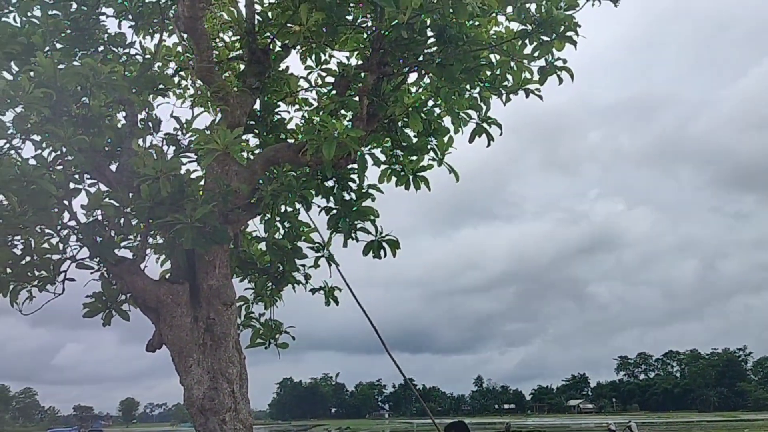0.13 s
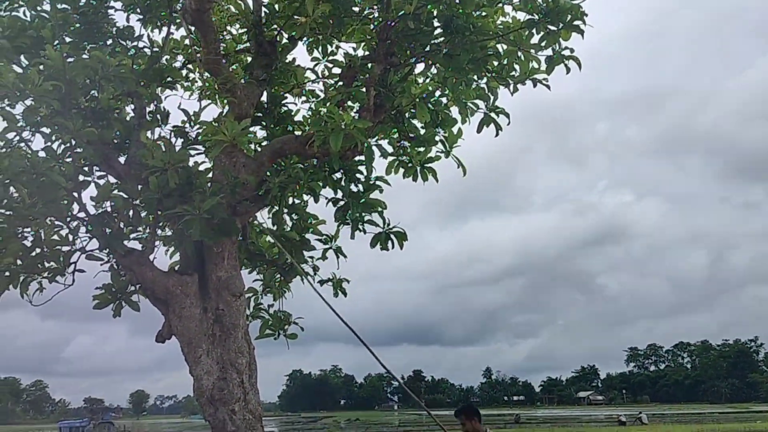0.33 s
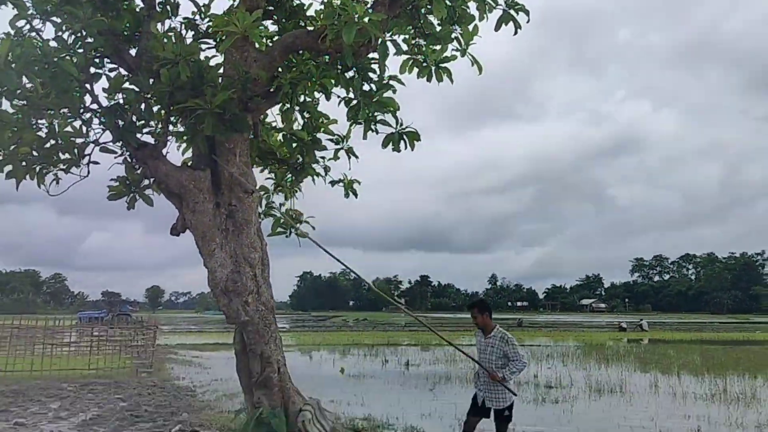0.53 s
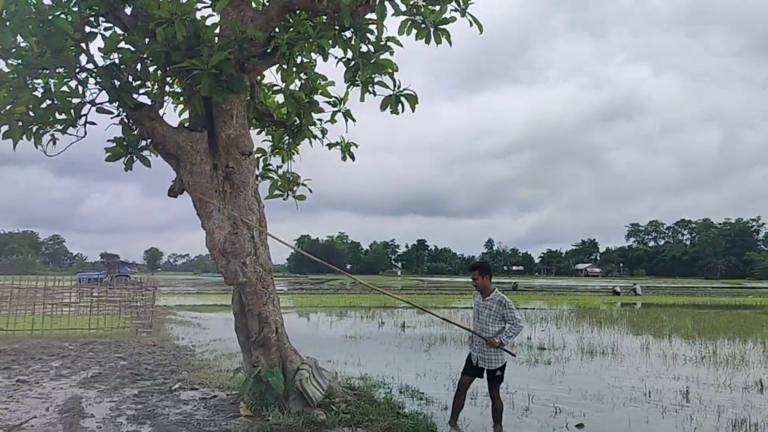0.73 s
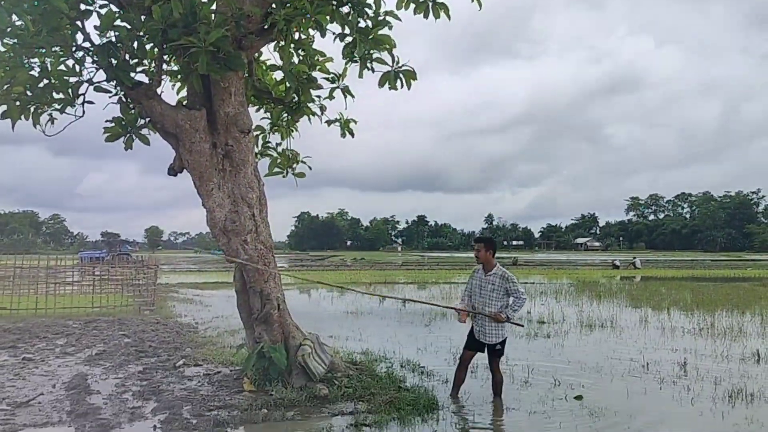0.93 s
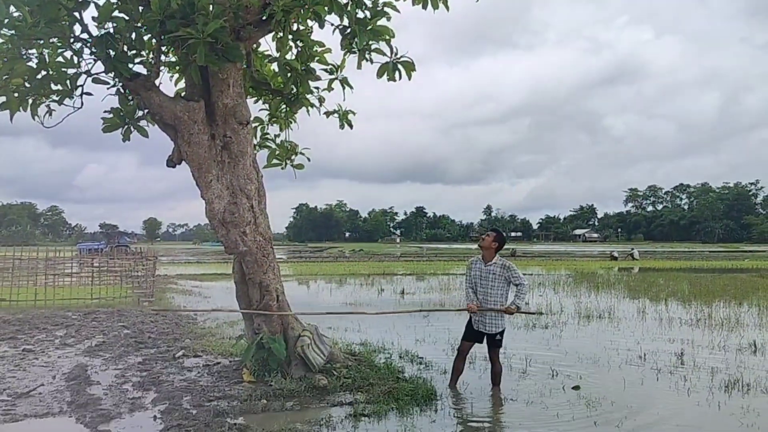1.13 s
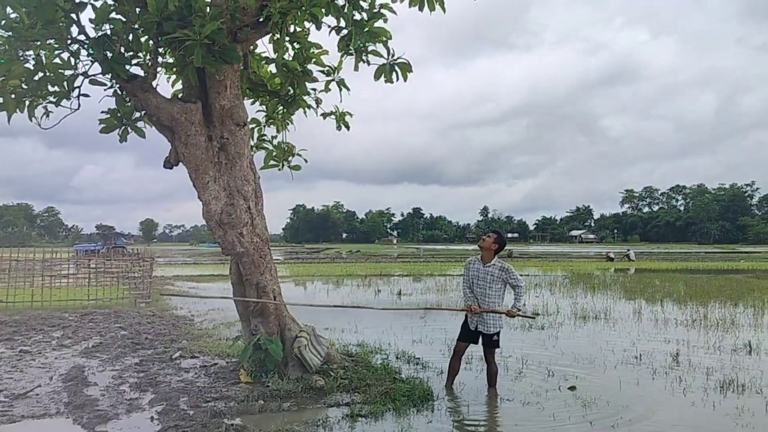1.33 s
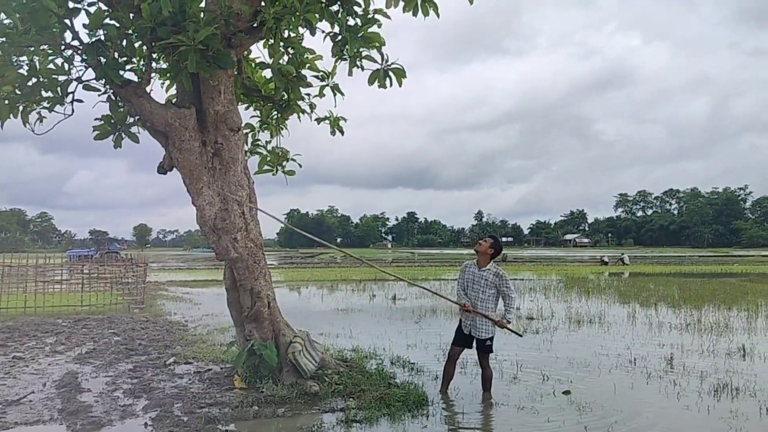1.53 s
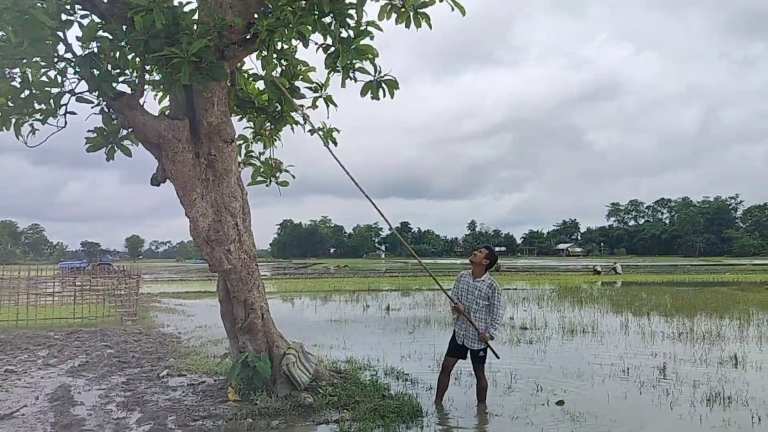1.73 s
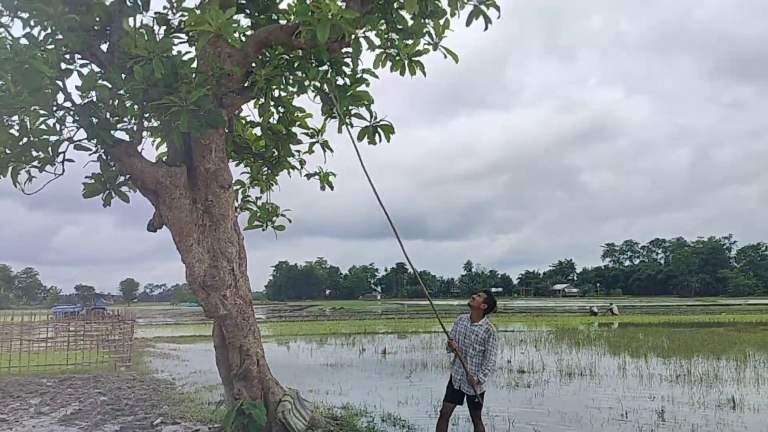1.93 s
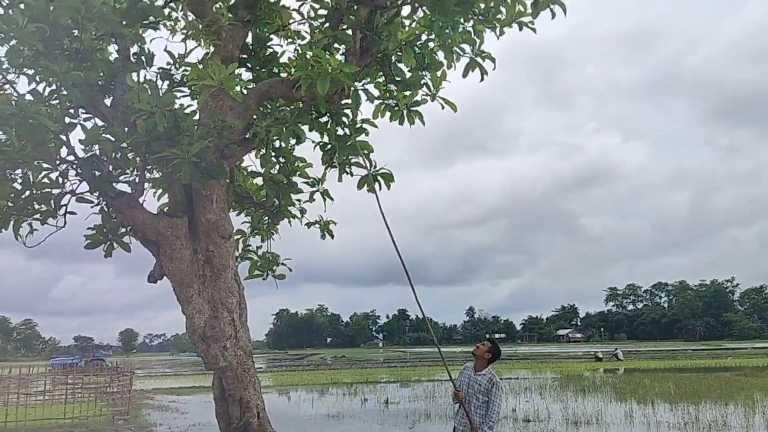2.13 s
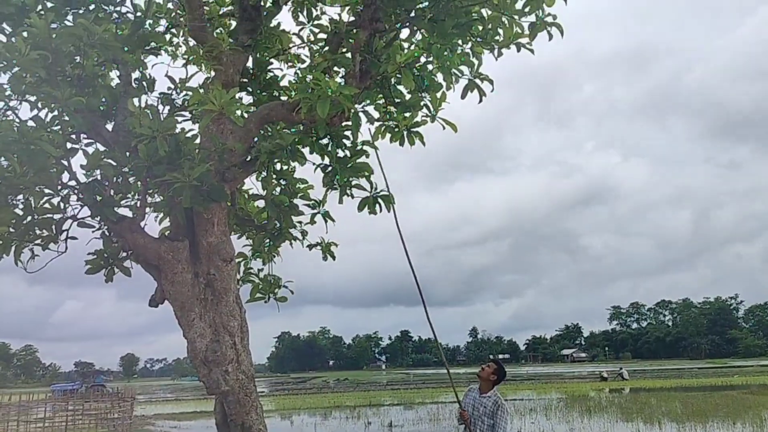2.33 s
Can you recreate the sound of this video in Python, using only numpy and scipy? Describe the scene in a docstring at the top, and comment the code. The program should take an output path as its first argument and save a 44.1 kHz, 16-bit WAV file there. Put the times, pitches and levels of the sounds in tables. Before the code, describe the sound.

A bamboo pole ticks sharply against a leafy branch, then later strikes it in a harder woody clatter with rustling leaves; wind buffets the hand-held microphone while a bird whistles and buzzes in open fields.

```python
"""Beside flooded fields, a bamboo pole knocks and clatters against leafy branches: bursts of contacts ring
wood modes, and showers of tiny snaps make the leaves. To the right a bird buzzes (beating noise bands) and
whistles (gliding near-sines); others call far off. Something small plops into the water (a rising sine).
Wind rumbles and buffets the two ports of a hand-held microphone (noise and slow cycles), insects hiss
high up (narrow noise bands), and a faint noise bed is the open air."""
import sys
import numpy as np
from scipy import signal
from scipy.fft import rfft, irfft
from scipy.io import wavfile
from scipy.ndimage import uniform_filter1d

SR = 44100
rng = np.random.default_rng(int(sys.argv[2]) if len(sys.argv) > 2 else 0)


def digitize_waveform(pressure):
    """Quantize a signal to 16-bit integers and store it at the path in sys.argv[1].

    Rows of a 2-D input are taken as channels; values are limited to [-1, 1].
    """
    field = np.atleast_2d(pressure).T
    bounded = np.clip(field, -1, 1)
    quanta = np.round(bounded * 32767).astype(np.int16)
    wavfile.write(sys.argv[1], SR, quanta)


N = 105310  # length in samples


def gain_of(db):
    """Decibels to amplitude gain."""
    return 10 ** (np.asarray(db) / 20)


def evened(x):
    """Scales to rms 1."""
    return x / np.sqrt(np.mean(x ** 2) + 1e-20)


def read(points, hz):
    """Reads a table of values on a log-frequency axis."""
    f, value = np.transpose(points)
    return np.interp(np.log(hz + 1), np.log(f + 1), value)


def add(mix, s, sound):
    """Mixes a sound in at time s in seconds, cut off at the end of the mix."""
    part = mix[..., max(round(s * SR), 0):][..., :sound.shape[-1]]
    part += sound[..., :part.shape[-1]]


def drift(rate_hz, size):
    """Smooth random wander of rms 1: noise with its fast changes removed."""
    hz = np.fft.rfftfreq(size, 1 / SR)
    return evened(irfft(rfft(rng.standard_normal(size)) * np.exp(-(hz / rate_hz) ** 2), size))


def resonate(x, hz, width):
    """Band of gain 1 around hz (fixed or moving): shift to zero, smooth twice for steep skirts, shift back."""
    turn = np.exp(2j * np.pi * np.cumsum(hz * np.ones(x.shape[-1])) / SR)
    r = np.exp(-np.pi * width / SR)
    smooth = signal.lfilter([(1 - r) ** 2], [1, -2 * r, r * r], x / turn)
    return 2 * (turn * smooth).real


def colour(x, table):
    """Filters each channel by a spectrum in dB."""
    return irfft(rfft(x) * gain_of(read(table, np.fft.rfftfreq(N, 1 / SR))), N)


ECHO_DB, ECHO_T60_S = -2.5, 0.19


def place(x, pan_db, lag_s, t60=ECHO_T60_S):
    """Direct sound reaches the left port lag_s late; trunk, ground and water scatter it differently to each."""
    hz = np.fft.rfftfreq(N, 1 / SR)
    late = irfft(rfft(x) * np.exp(-2j * np.pi * hz * lag_s), N)
    t = np.arange(8000) / SR
    sparse = rng.standard_normal((2, 8000)) * (rng.random((2, 8000)) < .05)
    taps = sparse * gain_of(-60 * t / t60) * (t > .001)
    taps = taps / np.linalg.norm(taps, axis=1, keepdims=True)
    wet = signal.fftconvolve(x[None], taps, axes=1)[:, :N]
    return (np.array([late, x]) + gain_of(ECHO_DB) * wet) * gain_of([[pan_db / 2], [-pan_db / 2]])


def field(table, same, size, patchy_db, lag_s=0):
    """Stereo noise of rms 1 from random short-time spectra with drifting patches."""
    frames, hz = 4 * N // size + 5, np.fft.rfftfreq(size, 1 / SR)
    a, b, c, d, patches = rng.standard_normal((frames, len(hz), 5)).T
    patches = evened(uniform_filter1d(uniform_filter1d(patches, size=8, axis=0), size=8, axis=1))
    same = np.clip(read(same, hz), -1, 1)[:, None]
    left = a + 1j * b
    shared = same * left * np.exp(2j * np.pi * lag_s * hz)[:, None]
    z = np.array([left, shared + np.sqrt(1 - same ** 2) * (c + 1j * d)])
    z *= gain_of(read(table, hz)[:, None] + patchy_db * patches)
    return evened(signal.istft(z, nperseg=size, noverlap=3 * size // 4)[1][:, :N])


# Blows of the pole. Each row: start in seconds, level in dB, clatter length in seconds, best-rung pitch in Hz.
POLE_BLOWS = [(0.2697, -41.5, 0.002, 2930), (0.2729, -40, 0.002, 2360), (0.284, -59, 0.0025, 2520),
              (1.176, -62, 0.003, 1900), (1.2187, -61, 0.0028, 2190), (1.9055, -27, 0.0088, 2160),
              (1.918, -37.5, 0.022, 2720), (1.924, -35, 0.018, 460), (1.949, -39, 0.0073, 1240),
              (1.959, -35, 0.01, 1370), (1.969, -41, 0.025, 1800), (2.094, -47.5, 0.018, 2020),
              (2.12, -53.5, .012, 1360), (2.151, -57, 0.0055, 3560)]
# Ring of pole and branch. Each row: pitch in Hz before detuning, level in dB, t60 in seconds.
WOOD_MODES = [(311, -0.5, 0.16), (392, -2, 0.087), (850, -21.5, 0.032), (933, -0.5, .02),
              (1219, 2.5, 0.031), (1355, 5, 0.036), (1710, -3, 0.044), (1948, 0.5, 0.063), (2190, 9, 0.011),
              (2753, 0, 0.02), (2934, 3, 0.017), (3490, -15.5, .02), (3750, -6.5, 0.031), (4820, -19, 0.03)]
# Struck places, before and after the pole is lowered. Each row: left-right in dB, left lag in seconds.
STRUCK_PLACES = [(0, -.00004), (-4.5, -.00022)]
LOWERED_S, BOUGH_T60_S = 1, 0.085
CONTACTS_PER_S, CRACK_DB = 2500, 1.5
OFF_PITCH_DB_PER_OCTAVE = -14
SPOT_DETUNE = .03  # largest random shift of a mode, as a share of its pitch


def pole():
    """Each blow is a short clatter of contacts that rings the wood, best near the pitch of the struck spot."""
    out, t = np.zeros((2, N)), np.arange(5000) / SR
    for s, db, length, best_hz in POLE_BLOWS:
        chance, size = rng.random(2000), rng.uniform(-0.84, 1, 2000)
        arch = np.sqrt(np.sin(np.pi * np.clip(t[:2000] / length, 0, 1)) + 1e-9)
        contacts = (chance < CONTACTS_PER_S / SR) * size * arch
        contacts[0] = 0.3  # the first touch always sounds
        ring = np.zeros(5000)
        for hz, mode_db, t60 in WOOD_MODES:
            off_pitch_db = OFF_PITCH_DB_PER_OCTAVE * abs(np.log2(hz / best_hz))
            spot_hz = hz * (1 + SPOT_DETUNE * rng.uniform(-1, 1))
            ring += gain_of(mode_db + off_pitch_db - 60 * t / t60) * np.sin(2 * np.pi * spot_hz * t)
        crack = resonate(rng.standard_normal(5000), 4960, 6000)
        # higher-pitched spots crack louder
        ring += gain_of(CRACK_DB - 60 * t / 0.0077) * crack * best_hz / 2000
        blow = np.convolve(contacts, ring) / np.linalg.norm(contacts)
        add(out[int(s > LOWERED_S)], s, gain_of(db) * blow)
    return sum(place(x, *spot, BOUGH_T60_S) for x, spot in zip(out, STRUCK_PLACES))


# Shaken leaves. Each row: start in seconds, level in dB, t60 in seconds.
LEAF_SHAKES = [(.0, -43, 0.15), (0.163, -55, 0.045), (0.274, -37, 0.081), (0.286, -50, 0.25),
               (0.38, -61.5, 0.26), (0.946, -68.5, 0.19), (1.61, -56.5, 0.21), (1.908, -51.5, 0.48),
               (1.962, -51.5, 0.46), (2.021, -51, 0.037), (2.098, -58, 0.14), (2.238, -63, 0.58)]
# Leaf spectrum. Each row: frequency in Hz, relative level in dB per Hz.
LEAF_COLOUR = [(350, -95), (957, -26), (1180, -17.5), (2400, -13), (2950, -10), (5260, -30), (8200, -16.5),
               (11700, -18.5), (16000, -45)]
SNAPS_PER_S, SNAP_SPREAD_DB = 5000, 1.5


def leaves():
    """Dense tiny snaps under a quick rise and a decay; overlapping shakes add in power."""
    spread = np.minimum(rng.exponential(1, (2, N)), 4)
    snaps = rng.standard_normal((2, N)) * gain_of(SNAP_SPREAD_DB * spread)
    snaps *= rng.random((2, N)) < SNAPS_PER_S / SR
    snaps = evened(colour(snaps, LEAF_COLOUR))
    power, t = np.zeros(N), np.arange(SR // 2) / SR
    for s, db, t60 in LEAF_SHAKES:
        add(power, s, (np.minimum(t / 0.0039, 1) * gain_of(db - 60 * t / t60)) ** 2)
    return snaps * np.sqrt(power)


WAVER_HZ, FLUTTER_DB = 29.8, 1.5  # rms wander of pitch and level
WARBLE_PER_S = 30.8  # how fast both wander
THIRD_BELOW_DB = -17  # third harmonic against the second


def note(length, db, first_hz, last_hz, peak, overtone_db=-80):
    """A gliding near-sine that swells to its peak and fades, with a little waver; overtones swell with it."""
    u = np.arange(0, length, 1 / SR) / length
    waver, flutter = drift(WARBLE_PER_S, 20000)[:len(u)], drift(WARBLE_PER_S, 20000)[:len(u)]
    glide = first_hz + (last_hz - first_hz) * (1 - np.cos(np.pi * u)) / 2
    phase = 2 * np.pi * np.cumsum(glide + WAVER_HZ * waver) / SR
    bend = np.log(.5) / np.log(np.clip(peak, .1, .9))  # puts the top of the arch at the peak
    swell = np.sin(np.pi * u ** bend) ** 1.67
    overtones = np.sin(2 * phase) + gain_of(THIRD_BELOW_DB) * np.sin(3 * phase)
    tone = np.sin(phase) + swell * gain_of(overtone_db) * overtones
    return np.sqrt(2) * gain_of(db + FLUTTER_DB * flutter) * swell * tone


BEATS_PER_S = 52
BEAT_DEPTH_LOW, BEAT_DEPTH_HIGH = .6, .28  # below and above 4 kHz
BUZZ_S, BUZZ_RISE_S, BUZZ_FALL_S = 0.28, 0.061, 0.047
BUZZ_SAG = .025  # share by which the throat sinks
BIRD_PAN_DB, BIRD_LAG_S = -4.5, 0.000472
# Buzzes of the near bird. Each row: start in seconds, level in dB.
BUZZ_CALLS = [(0.476, -60), (1.399, -61), (2.33, -60.5)]
# Throat bands at the start of a buzz. Each row: centre in Hz, width in Hz, level in dB.
THROAT_BANDS = [(2030, 280, -4.5), (2430, 290, -5.5), (3660, 560, 4.5), (4324, 300, 1.5), (4830, 120, -8),
                (6070, 1500, -4), (8030, 960, -5.5), (9300, 770, -9)]
# Falling whistles. Each row: start in seconds, length in seconds, level in dB, first pitch in Hz,
# last pitch in Hz, place of the peak from 0 to 1, overtones in dB.
WHISTLE_CALLS = [(.0, 0.25, -61, 4342, 3823, 0.59, -27), (0.416, 0.15, -76.5, 4100, 3930, 0.2, -40),
                 (0.738, 0.26, -50.5, 4398, 3942, 0.51, -17.5), (1.646, 0.28, -52.5, 4215, 3720, 0.67, -15)]


def near_bird():
    """A hoarse buzz, beating noise through sinking throat bands, and a thin falling whistle."""
    out = np.zeros(N)
    t = np.arange(0, BUZZ_S, 1 / SR)
    beat = -np.cos(2 * np.pi * BEATS_PER_S * t)
    ramps = np.clip(np.minimum(t / BUZZ_RISE_S, (BUZZ_S - t) / BUZZ_FALL_S), 0, 1)
    for s, db in BUZZ_CALLS:
        noise = rng.standard_normal(len(t))
        voice = np.zeros(len(t))
        for hz, width, band_db in THROAT_BANDS:
            depth = BEAT_DEPTH_LOW if hz < 4000 else BEAT_DEPTH_HIGH
            breath = noise * (1 + depth * beat) ** 2
            band = resonate(breath, hz * (1 - BUZZ_SAG * t / BUZZ_S), width)
            voice += gain_of(band_db) * evened(band)
        add(out, s, gain_of(db) * evened(voice) * ramps)
    for s, *whistle in WHISTLE_CALLS:
        add(out, s, note(*whistle))
    return place(out, BIRD_PAN_DB, BIRD_LAG_S)


# Distant notes. Each row: start in seconds, length in seconds, level in dB, first pitch in Hz, last pitch in Hz.
DISTANT_NOTES = [(1.032, 0.11, -79, 2650, 2080), (1.237, 0.031, -65, 1410, 1340),
                 (1.254, 0.21, -69.5, 1462, 1167), (1.362, 0.021, -62.5, 2050, 1855),
                 (1.454, 0.022, -66, 1960, 1980), (1.548, 0.038, -64, 2083, 1823),
                 (1.56, 0.068, -70, 1360, 1410), (1.626, 0.028, -64, 1760, 1570)]
# A far falling rasp. One row: level in dB, first pitch in Hz, last pitch in Hz, width in Hz.
DISTANT_RASP = (-60.5, 3099, 2800, 120)
RASP_S, RASP_LENGTH_S = .622, .14
FAR_PEAK = 0.35  # place of a note's peak, 0-1
FAR_PAN_DB, FAR_LAG_S = -5.5, 0.00043


def far_birds():
    """Soft single gliding notes across the fields, and one rasp of beating noise in a falling band."""
    out = np.zeros(N)
    for s, length, db, first, last in DISTANT_NOTES:
        add(out, s, note(length, db, first, last, FAR_PEAK))
    db, first, last, width = DISTANT_RASP
    t = np.arange(0, RASP_LENGTH_S, 1 / SR)
    u = t / RASP_LENGTH_S
    beat = np.cos(2 * np.pi * BEATS_PER_S * t)
    noise = rng.standard_normal(len(t)) * (1 + BEAT_DEPTH_LOW * beat) ** 2
    rasp = evened(resonate(noise, first + (last - first) * u, width))
    add(out, RASP_S, gain_of(db) * np.sin(np.pi * u) * rasp)
    return place(out, FAR_PAN_DB, FAR_LAG_S)


DROP_S, DROP_DB, DROP_T60_S = .041, -32, 0.04
DROP_HZ, DROP_RISE = 846, 0.16  # starting pitch, and the share it rises by


def drop():
    """Something small plops into the water: a bubble whose pitch rises as it dies."""
    out, t = np.zeros((2, N)), np.arange(2500) / SR
    phase = 2 * np.pi * DROP_HZ * np.cumsum(1 + DROP_RISE * np.minimum(t / 0.017, 1)) / SR
    fade = gain_of(DROP_DB - 60 * (t / DROP_T60_S) ** 1.16)
    add(out, DROP_S, np.minimum(t / 0.0027, 1) * fade * np.sin(phase))
    return out


# Wind buffets. Each row: centre in seconds, port (0 left, 1 right), peak in dB, pitch in Hz, length in seconds.
WIND_BUFFETS = [(0.042, 0, -33.5, 98, 0.021), (0.066, 1, -26, 46, 0.069), (0.121, 1, -23, 62, 0.012),
                (0.162, 1, -29.5, 52.8, 0.087), (0.237, 0, -26.5, 95.5, 0.026), (0.26, 1, -23, 61, 0.078),
                (0.376, 1, -22.5, 97, 0.019), (0.454, 1, -33.5, 109, 0.027), (0.791, 1, -30.5, 61.7, 0.016),
                (0.915, 1, -26.5, 110.3, 0.04), (1.139, 0, -36, 118.4, 0.04), (1.149, 1, -29.5, 81, 0.023),
                (1.181, 0, -26, 91, 0.02), (1.305, 1, -19, 140.3, 0.019), (1.574, 1, -31.5, 105, 0.028),
                (1.638, 1, -30, 74, 0.031), (1.706, 1, -34, 63.4, 0.073), (1.859, 0, -40.5, 95.5, 0.087),
                (1.922, 1, -28, 90.2, 0.054), (1.966, 0, -31, 74, 0.016), (1.959, 1, -21.5, 67.4, 0.013),
                (2.007, 1, -33.5, 82.5, 0.052), (2.259, 0, -35, 95, 0.022)]
# Course of the rumble. Each row: time in seconds, level in dB, left-right in dB.
WIND_COURSE = [(0, -46.5, -2.5), (.3, -39.5, -3.5), (.6, -48.5, -2.5), (0.751, -41, -3), (1.031, -48, -1.5),
               (1.25, -41.5, -8.5), (1.43, -48.5, -2), (1.68, -41, -4.5), (2.05, -42.5, 2), (2.2, -46, -1),
               (2.39, -48, 9)]
# Rumble spectrum. Each row: frequency in Hz, relative level in dB per Hz.
RUMBLE_COLOUR = [(18, -24.5), (38, 8), (210, -4), (257, -15.5), (319, -11.5), (600, -29.5), (780, -41),
                 (1320, -120)]
BUFFET_HISS_DB, BUFFET_HISS_HZ = -20, 245


def wind():
    """Lumpy rumble, only partly alike at the two ports, with separate buffets of a few slow cycles and hiss."""
    t = np.arange(N) / SR
    s, db, pan_db = np.transpose(WIND_COURSE)
    db, pan_db = np.interp(t, s, db), np.interp(t, s, pan_db)
    likeness = [(20, 0.35), (600, 0.48)]  # Hz, left-right likeness
    out = field(RUMBLE_COLOUR, likeness, size=1024, patchy_db=4.0)
    out = out * gain_of([db + pan_db / 2, db - pan_db / 2])
    hiss = evened(resonate(rng.standard_normal((2, N)), BUFFET_HISS_HZ, 144.0))
    puff, u = np.zeros((2, N)), np.arange(-4000, 4000) / SR
    for s, port, db, hz, length in WIND_BUFFETS:
        bell = gain_of(db) * np.exp(-(u / (0.51 * length)) ** 2)
        cycles = bell * np.sin(2 * np.pi * (hz * u + rng.random()))
        k, start = int(port > .5), s - 4000 / SR
        skip = max(4000 - round(s * SR), 0)  # the part before time zero
        add(out[k], start, cycles[skip:])
        add(puff[k], start, (bell * (hz / 100) ** 2)[skip:])  # faster buffets hiss more
    return out + gain_of(BUFFET_HISS_DB) * puff * hiss


# Course of the insects. Each row: time in seconds, level in dB.
INSECT_COURSE = [(0, -57), (.13, -64), (.35, -73.5), (0.748, -75.5), (1.152, -76.5), (1.36, -72.5),
                 (1.45, -72), (1.78, -64.5), (1.95, -74.5), (2.27, -64.5), (2.39, -83)]
# Insect bands. Each row: centre in Hz, width in Hz, level in dB.
HISS_BANDS = [(10110, 480, -4.5), (10670, 200, -1.5), (11190, 150, 5.5), (11530, 240, -6)]
SHIMMER_DB, SHIMMER_HZ = 5.5, 5


def insects():
    """Narrow high bands of hiss, each with its own slow shimmer in level."""
    bands = np.zeros((2, N))
    for hz, width, band_db in HISS_BANDS:
        shimmer = gain_of(band_db + SHIMMER_DB * drift(SHIMMER_HZ, N))
        bands += shimmer * evened(resonate(rng.standard_normal((2, N)), hz, width))
    s, db = np.transpose(INSECT_COURSE)
    return evened(bands) * gain_of(np.interp(np.arange(N) / SR, s, db))


# Open-air spectrum. Each row: frequency in Hz, relative level in dB per Hz.
AIR_COLOUR = [(88, -22), (150, 5), (193, -24), (431, -12.5), (941, -12.5), (1290, -16), (2060, -16.5),
              (2550, -16.5), (2760, -20.5), (9630, -67), (11300, -90), (16000, -37)]
# Likeness of the air at the two ports. Each row: frequency in Hz, left-right likeness.
AIR_LIKENESS = [(300, 0.54), (3000, 0.21), (5000, .1)]
AIR_DB, AIR_LAG_S = -65, 0.00037  # left port late


def open_air():
    """Faint steady noise bed, more alike at the two ports in the lows."""
    return gain_of(AIR_DB) * field(AIR_COLOUR, AIR_LIKENESS, size=1024, patchy_db=1.0, lag_s=AIR_LAG_S)


def scene():
    """All sources over the open air."""
    return pole() + leaves() + near_bird() + far_birds() + drop() + wind() + insects() + open_air()


EDGE_HZ = 15800


def record(dry):
    """Band limit: a steep low-pass at the edge."""
    low_pass = signal.firwin(511, EDGE_HZ, window=("kaiser", 9), fs=SR)
    return signal.oaconvolve(dry, low_pass[None], "same")


dry = scene()
out = record(dry)
digitize_waveform(out)
```